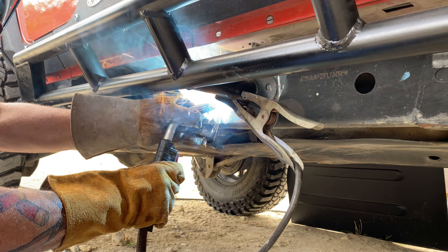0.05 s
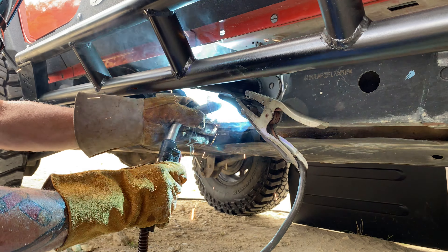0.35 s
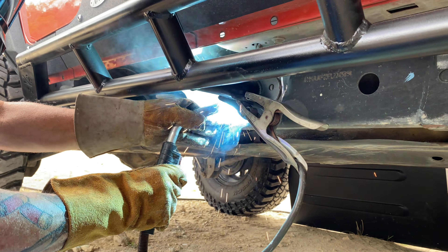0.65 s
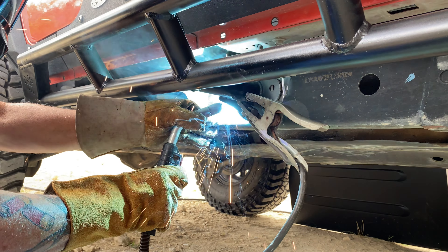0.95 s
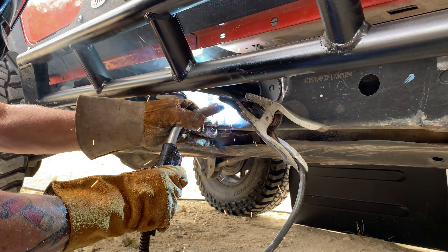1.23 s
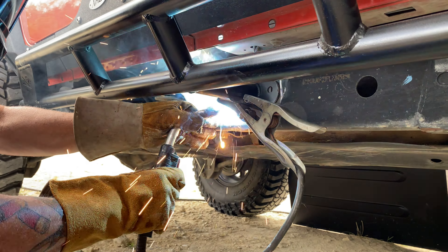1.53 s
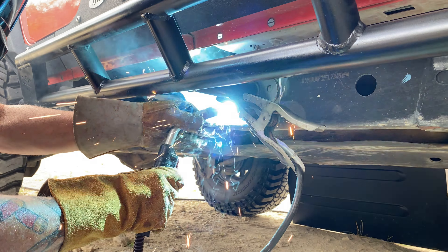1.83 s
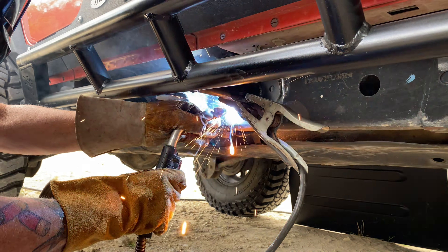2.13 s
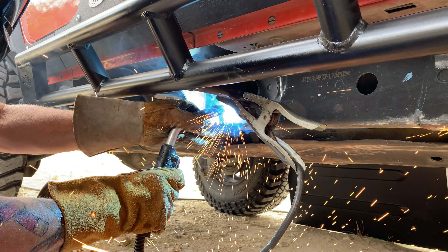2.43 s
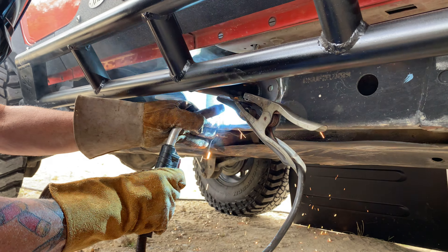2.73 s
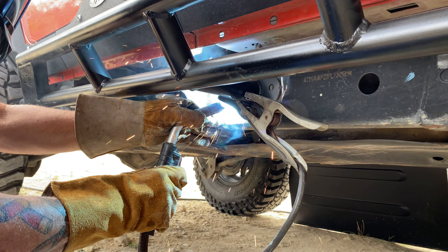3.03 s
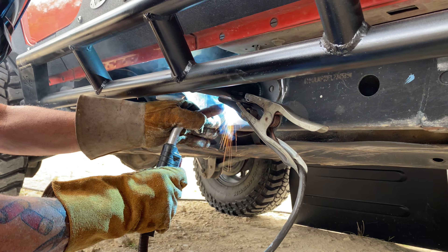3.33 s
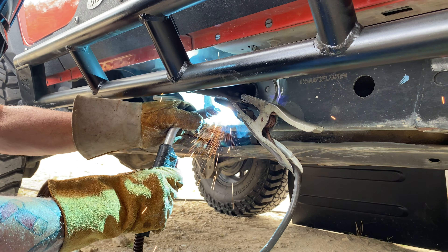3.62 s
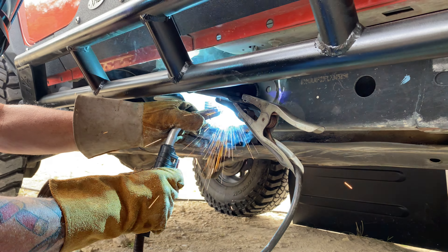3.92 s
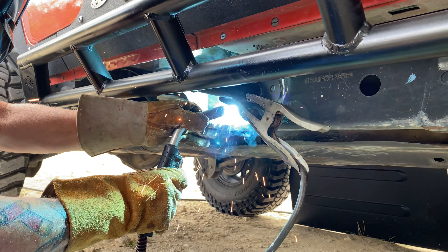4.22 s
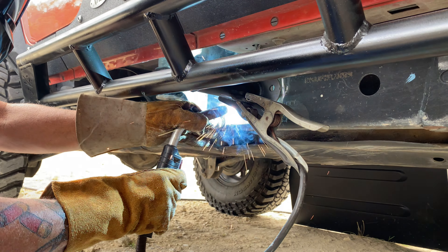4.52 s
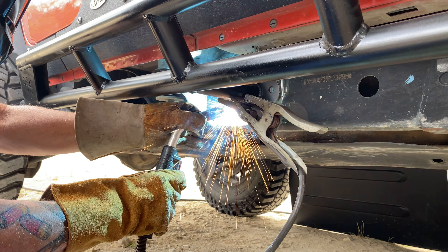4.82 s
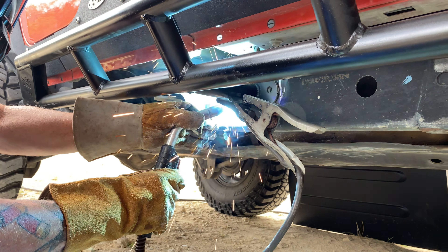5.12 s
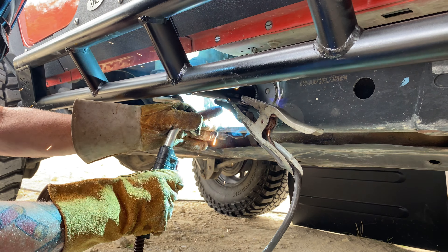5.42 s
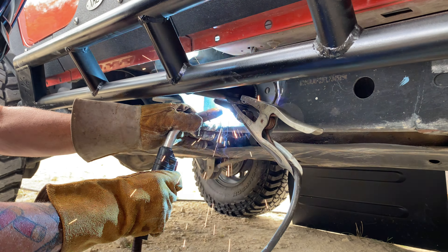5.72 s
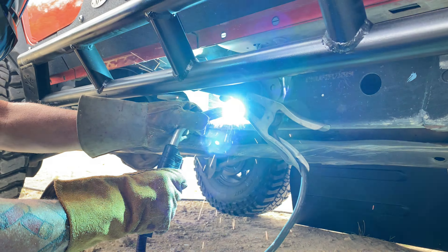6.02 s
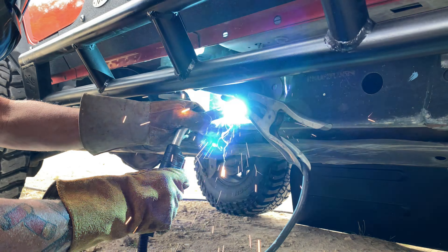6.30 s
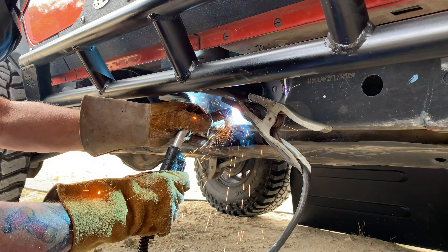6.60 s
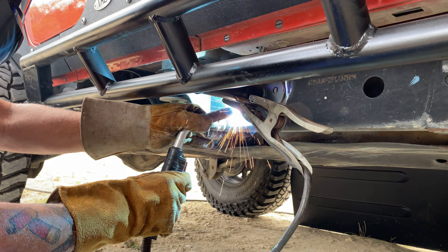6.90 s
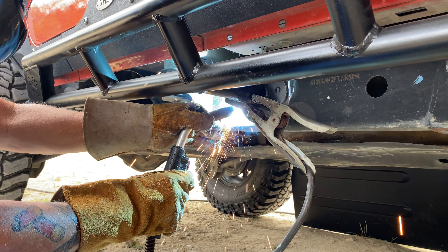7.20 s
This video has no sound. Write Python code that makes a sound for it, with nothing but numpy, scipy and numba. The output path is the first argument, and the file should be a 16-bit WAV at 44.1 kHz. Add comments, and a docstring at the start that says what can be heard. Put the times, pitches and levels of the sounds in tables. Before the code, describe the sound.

Close, sputtering wire-feed welding in a workshop: a thin, bright sizzle packed with irregular snaps and spits, faltering briefly.

```python
"""A hissing, sputtering arc, broken by sharp pops: a wire-feed welder runs a bead on a vehicle frame,
close by, in a workshop. The plasma hisses and spits droplets; each time the wire shorts into the pool
and burns free, it cracks and throws a puff of hot gas. When the wire stubs, the arc dies for a moment.
Resonances of the torch gap and the steel pocket colour the sound on its way to two microphones."""
import sys
import numpy as np
from scipy import signal
from scipy.fft import rfft, irfft, next_fast_len
from scipy.io import wavfile
from numba import njit

SR = 44100
rng = np.random.default_rng(int(sys.argv[2]) if len(sys.argv) > 2 else 0)


def output_pcm(signal):
    """Save a mono or channel-first signal as 16-bit PCM at the path in sys.argv[1].

    Samples are clipped to [-1, 1] before scaling.
    """
    pcm = np.clip(np.atleast_2d(signal).T, -1, 1) * 32767
    wavfile.write(sys.argv[1], SR, np.round(pcm).astype(np.int16))


N = 324135
TIME_S = np.arange(N) / SR
FFT_SIZE = next_fast_len(N + SR // 2)
FREQ_HZ = np.maximum(np.arange(FFT_SIZE // 2 + 1) * SR / FFT_SIZE, 1)
LEAD_IN = SR // 100  # samples ahead of each burst
BURST_TIME_S = np.arange(-LEAD_IN, SR // 30) / SR

# The wire burns free, at relative levels: start_s, crack_db, body_re_crack_db, thump_db, thump_hz
POPS = [(0.0741, -1, -15.5, -25.5, 192), (0.128, -10.5, -10.5, -28, 560), (0.2073, -10.5, -6, -14.5, 183),
        (0.2251, -11, -11, -24, 219), (0.2393, -9.5, -11.5, -29, 240), (0.2553, -11, -12.5, -20, 530),
        (0.314, -12.5, -8.5, -21, 530), (0.4038, -21.5, -3, -30, 560), (0.4497, -7, -12, -23.5, 200),
        (0.47, -7.5, -10.5, -22, 560), (0.5036, -10, -7.5, -14, 378), (0.5292, -10.5, -5.5, -19, 500),
        (0.564, -9.5, -5, -13, 563), (0.5862, -13, -10, -31, 560), (0.6034, -6, -15, -30, 560),
        (0.6358, -13.5, -8.5, -36, 530), (0.711, -7, -11, -15, 560), (0.738, -13.5, -11, -34, 560),
        (0.7542, -11.5, -9.5, -39, 500), (0.7947, -8, -17, -32, 445), (0.825, -8.5, -14, -39, 560),
        (0.8626, -4.5, -11, -22, 200), (0.8959, -8, -8.5, -24.5, 200), (0.9256, -7.5, -12, -28, 210),
        (0.9566, -4.5, -11.5, -21, 159), (0.9954, -7.5, -11.5, -19.5, 560), (1.0796, -18.5, -8, -34, 560),
        (1.0929, -12.5, -1.5, -19.5, 470), (1.161, -11.5, -10.5, -26, 530), (1.2048, -27, -6, -31, 530),
        (1.2382, -8, -15.5, -30, 190), (1.2711, -3, -13, -22.0, 270), (1.3863, -12.5, -11, -42, 560),
        (1.443, -19, -8.5, -50, 560), (1.479, -4.5, -12, -21.5, 105), (1.5116, -5.5, -12, -24, 180),
        (1.5376, -3, -15, -27.5, 100), (1.555, -10, -14.5, -32, 170), (1.5742, -15, -13, -38, 135),
        (1.6143, -11.0, -9, -23, 210), (1.6719, -11, -12.5, -29, 395), (1.687, -23.5, -2.5, -35, 355),
        (1.6964, -16.5, -7.5, -31, 300), (1.7286, -10, -10.5, -26, 240), (1.77, -12.5, -4, -20, 560),
        (1.7971, -12, -7.5, -26, 190), (1.8202, -10, -10, -23.5, 300), (1.8425, -10, -11.5, -34, 300),
        (1.8642, -18, -11, -37, 160), (1.8749, -5, -11.5, -29, 190), (1.9233, -12, -10.5, -31, 500),
        (1.9378, -19, -3.5, -29.5, 335), (1.9808, -9, -11, -26, 250), (2.1397, -6, -23, -41, 250),
        (2.1538, -5, -15, -29, 250), (2.23, -6.5, -19, -24, 560), (2.2757, -9.5, -16, -38, 560),
        (2.2887, -5, -20, -28.5, 265), (2.3038, -11, -16.5, -34.0, 560), (2.449, -8.5, -17.5, -36, 560),
        (2.454, -7, -20, -26, 556), (2.5872, -1, -20, -30, 210), (2.6039, -3.5, -15, -21.5, 229),
        (2.6148, -5.5, -17, -41, 200), (2.6243, -2.5, -16.5, -25.5, 230), (2.67, -1.5, -15.5, -26.5, 191),
        (2.8368, -11, -13.5, -28, 560), (2.9027, -12, -15, -28.5, 335), (3.0104, -4, -12, -24, 123),
        (3.0886, -25.5, -4, -34, 397), (3.213, -12, -17, -36, 560), (3.2404, -5, -17, -20.5, 560),
        (3.3001, -3.5, -23, -29.5, 100), (3.3622, -11.5, -18.5, -39, 500), (3.3841, -7.5, -21, -35, 335),
        (3.5294, -13, -17.5, -30, 560), (3.5573, -1, -18, -20, 172), (3.626, -6, -11.5, -27, 170),
        (3.649, -4, -15.5, -27, 170), (3.6782, -2.5, -19, -23.5, 135), (3.745, -8.5, -8, -23, 180),
        (3.775, -7.5, -11, -24, 225), (3.795, -3.5, -10.5, -22.5, 258), (3.8319, -10, -14, -28, 355),
        (3.8745, -5, -13.5, -26.5, 125), (3.9414, -9, -14.5, -32, 240), (3.982, -10, -14, -44, 560),
        (4.0015, -2, -16.5, -23.5, 150), (4.0437, -5, -12.5, -22.5, 134), (4.106, -15.5, -7.5, -31.0, 445),
        (4.1278, -14, -13, -23, 570), (4.138, -10.5, -16.5, -35, 280), (4.1609, -7.5, -17.5, -23, 560),
        (4.2127, -10, -7, -21, 156), (4.254, -14.5, -5.5, -20.5, 420), (4.3052, -10, -14.5, -24, 560),
        (4.387, -5, -12.5, -25, 200), (4.421, -4.5, -15.5, -22, 560), (4.4376, -13, -12, -27, 355),
        (4.4972, -15.5, -16, -44, 135), (4.57, -2.5, -18.5, -27, 445), (4.6083, -0.5, -19, -19, 355),
        (4.6434, -1.5, -19.5, -32, 210), (4.7544, -10, -24, -73, 265), (4.7682, -6.5, -24, -28.5, 583),
        (4.81, -4, -29, -28, 560), (4.8412, -8, -16, -32, 210), (4.847, 1, -23, -29.5, 210),
        (4.889, -1, -24, -26, 265), (4.9186, -9.5, -20, -32, 560), (4.9398, -10.5, -15, -32, 500),
        (4.9649, -6, -15, -19.0, 560), (5.003, -10, -15.5, -27, 560), (5.0461, -7.5, -16.5, -29, 250),
        (5.081, -16, -10.5, -32, 395), (5.0995, -3, -23.5, -32, 210), (5.1359, -8, -13, -27.5, 170),
        (5.163, -10.5, -19.5, -35, 280), (5.194, -15, -35, -37, 315), (5.226, -12.5, -19, -30, 560),
        (5.2683, -14, -20, -34, 470), (5.3503, -17.5, -15, -35, 530), (5.3678, -5, -19.5, -33.5, 191),
        (5.479, -19, -50, -65, 160), (5.4933, -6, -17, -33, 280), (5.524, -5.5, -22.5, -32.5, 190),
        (5.5472, -13, -18, -42, 420), (5.5617, -12, -18, -30, 560), (5.6197, -7, -15, -26.5, 250),
        (5.666, -9.5, -13.5, -31, 265), (5.6953, -3.5, -21, -34, 180), (5.737, -6.5, -12.5, -30, 250),
        (5.7696, -5.5, -11, -21, 150), (5.7987, -11, -6, -20, 560), (5.829, -6.5, -11.5, -22.5, 190),
        (5.8478, -4.5, -19, -42, 210), (5.881, -8.5, -7.5, -23, 180), (5.899, -13, -8, -28, 170),
        (5.9397, -7, -15, -34, 190), (5.956, -19.5, -6, -32, 190), (5.986, -9.5, -10, -27, 210),
        (6.0192, -7.5, -11.5, -31, 560), (6.0504, -9, -9, -29, 250), (6.0695, -7.5, -16.0, -31, 395),
        (6.0765, -18, -7, -35, 420), (6.085, -15.5, -9.5, -31, 335), (6.108, -6, -14.5, -24, 315),
        (6.1328, -4.5, -12.5, -23, 190), (6.1586, -8, -7.5, -18, 190), (6.1853, -8, -8.5, -24.5, 173),
        (6.2258, -9.5, -9, -27, 170), (6.248, -10.5, -11.5, -30, 210), (6.286, -10.5, -8.5, -25.5, 160),
        (6.314, -5.5, -13.5, -21, 211), (6.57, -6.5, -15, -26, 315), (6.598, -6, -18.5, -34, 200),
        (6.6081, -9.5, -15, -46.5, 200), (6.6184, -6, -19, -41, 200), (6.6312, -10, -18, -46, 560),
        (6.703, -2.5, -20, -29, 225), (6.739, -12, -40, -67, 240), (6.7742, -7, -21.5, -48, 240),
        (6.7927, -4, -13.5, -21, 240), (6.864, 3, -20.5, -18.5, 563), (6.932, -6.5, -18.5, -26.5, 560),
        (6.9704, -9, -13, -28, 355), (7.0009, -13, -14, -31, 335), (7.0188, -8.5, -17, -30, 315),
        (7.0361, -6, -11, -21.5, 393), (7.1427, -6, -12.5, -38, 225), (7.1952, -10.5, -10.5, -36, 375),
        (7.2145, -6, -13.5, -37, 335), (7.3014, -29, -16, -46, 265), (7.3166, -9.5, -13, -39, 194)]
# Relative strength of the rasp under the arc's hiss: time_s, level_db
RASP = [(0, -4.5), (1.2, -5), (1.9, -2), (2.4, -11.5), (2.53, -12), (2.61, -2), (2.68, -8), (2.8, -0.5),
        (3.2, -9), (3.5, -6), (4.3, -6), (4.8, -9.5), (5.15, -4.5), (5.35, -8.5), (5.46, -24), (5.6, -10),
        (5.85, -2.5), (6.3, -6.5), (6.45, -9.5), (6.6, -9), (6.74, -10.5), (7.35, -5)]


def from_db(db):
    """Amplitude grows tenfold every 20 dB."""
    return 10 ** (np.asarray(db) / 20)


def unit_rms(x):
    """Normalisation to unit mean power."""
    return x / np.sqrt(np.mean(x ** 2) + 1e-20)


def over_time(points, t=TIME_S):
    """Linear interpolation of (time_s, value) points."""
    return np.interp(t, *np.transpose(points))


def over_frequency(points):
    """Interpolation of (frequency_hz, value) points on a logarithmic frequency axis."""
    hz, value = np.transpose(points)
    return np.interp(np.log(FREQ_HZ), np.log(np.sort(hz)), value)


def filtered(x, response):
    """Convolution in time is multiplication in frequency."""
    return irfft(rfft(x, FFT_SIZE) * response, FFT_SIZE)[..., :N]


def coloured(x, spectrum):
    """Spectral shaping that conserves the power of a white signal."""
    return filtered(x, unit_rms(from_db(over_frequency(spectrum))))


def delay(seconds):
    """A pure delay shifts phase in proportion to frequency."""
    return np.exp(-2j * np.pi * FREQ_HZ * seconds)


def dispersion(lag_s):
    """An all-pass response: phase lag is the integral of group delay over frequency."""
    return np.exp(-2j * np.pi * np.cumsum(lag_s) * SR / FFT_SIZE)


def drift(bandwidth_hz):
    """Random modulation of unit rms, mostly below the given frequency."""
    knots = rng.standard_normal(FFT_SIZE // 16)
    return unit_rms(np.interp(TIME_S * 2 * bandwidth_hz, np.arange(len(knots)), knots))


def arc_level_db(t):
    """The arc's envelope follows the welder's hand and collapses wherever the wire stubs."""
    # Relative level of the burning arc: time_s, level_db
    burn = [(0, -34), (.18, -38), (.39, -32), (.45, -36.5), (.93, -35.5), (1.3, -33), (1.68, -34),
            (1.9, -34.5), (2.1, -40), (2.23, -22), (2.35, -43.5), (2.44, -36), (2.54, -40), (2.6, -33),
            (2.8, -35), (2.95, -32.5), (3.2, -32.5), (3.3, -35.5), (3.47, -36), (3.6, -36), (4.1, -37),
            (4.55, -36), (4.7, -33), (4.76, -37.5), (4.92, -32), (5.02, -41.5), (5.2, -30), (5.43, -34),
            (5.55, -34.5), (5.9, -35.5), (6.3, -34.5), (6.44, -30.5), (6.56, -28.5), (6.66, -36.5),
            (6.76, -23.5), (6.9, -36.5), (7.35, -33)]
    # The wire stubs and the arc dies: start_s, end_s, depth_db
    stubs = [(0.32, 0.354, -6.5), (0.41, 0.43, -14), (1.455, 1.466, -11.5), (1.588, 1.602, -10),
             (1.997, 2.077, -19), (2.176, 2.243, -24.5), (2.485, 2.497, -5), (2.846, 2.881, -10),
             (3.249, 3.286, -12), (3.4, 3.412, -12), (3.574, 3.612, -7.5), (3.703, 3.76, -6),
             (4.183, 4.191, -14), (4.466, 4.482, -10), (4.659, 4.725, -12.5), (5.581, 5.587, -21),
             (6.34, 6.419, -10), (6.464, 6.541, -22.5), (6.81, 6.839, -11)]
    die_s, relight_s = 0.0017, 0.019
    coarse_s = np.arange(0, N / SR, .001)
    stub_db = np.zeros(len(coarse_s))
    for start_s, end_s, depth_db in stubs:
        dying = (coarse_s - start_s) / die_s
        relighting = (end_s - coarse_s) / relight_s + 1
        stub_db += depth_db * np.clip(np.minimum(dying, relighting), 0, 1)
    return over_time(burn, t) + np.interp(t, coarse_s, stub_db)


def arc():
    """Amplitude-modulated noise: the plasma hisses and tiny droplets tick; loud pops blow it down."""
    # Spectral density of the thin hiss: frequency_hz, level_db
    hiss_spectrum = [(600, -17), (1300, -20), (2600, -32), (4200, -10.5), (6000, -1), (8000, 2.5),
                     (10000, 2), (12500, 3.5), (14500, 7)]
    # Spectral density of the rasping spatter: frequency_hz, level_db
    rasp_spectrum = [(100, -25), (300, 9.5), (600, -5.5), (1300, 4), (2800, 12), (6000, 4.5), (10000, -38),
                     (15000, -44)]
    loud_pop_db, lull_db, recovery_s = -16, -5.5, 0.11
    flutter_db, fizz_db, ragged_db = 2.2, 2.0, 2.9
    ticks_per_s, tick_spread_db = 1600, 3.0

    pop_s = np.sort([start_s for start_s, crack_db, *_ in POPS if crack_db > loud_pop_db])
    since_pop_s = abs(TIME_S - pop_s[np.searchsorted(pop_s, TIME_S) - 1])
    dips_db = lull_db * np.exp(-since_pop_s / recovery_s)
    strength = from_db(arc_level_db(TIME_S) + dips_db + flutter_db * drift(70))
    hiss = from_db(5.5) * unit_rms(rng.standard_normal(N) * from_db(fizz_db * drift(730)))

    tick_sizes = from_db(tick_spread_db * np.minimum(rng.exponential(1, N), 3))
    polarity = rng.choice([-1, 1], N)
    ticks = from_db(1) * unit_rms(tick_sizes * polarity * (rng.random(N) < ticks_per_s / SR))
    rasp = rng.standard_normal(N) + ticks
    rasp *= from_db(over_time(RASP) - 6 + ragged_db * drift(130))
    return coloured(strength * hiss, hiss_spectrum) + coloured(strength * rasp, rasp_spectrum)


def shop_air():
    """Background noise: a faint, low murmur, largely coherent between the two microphones."""
    # Spectral density of the quiet shop: frequency_hz, level_db
    spectrum = [(25, -12), (90, 16), (250, 12), (600, 8), (1500, -25), (15000, -32)]
    noise = rng.standard_normal(N) + 0.25 * rng.standard_normal((2, N))
    return from_db(-69) * coloured(noise, spectrum)


def faint_spits():
    """A random point process: drops leave the wire at log-normal intervals, as strong as the arc."""
    median_interval_s, spread_db = 1 / 55, 2.5
    chance = rng.standard_normal((400, 3))
    start_s = median_interval_s * np.cumsum(np.exp(chance[:, 0] / 2))
    crack_db = arc_level_db(start_s) + 1 + spread_db * chance[:, 1]
    body_re_crack_db = over_time(RASP, start_s) - 1 + spread_db * chance[:, 2]
    return np.column_stack([start_s, crack_db, body_re_crack_db])[start_s < N / SR]


def bursts(lead_db, spray_db, tail_db, tail_s, lead_s=.003, spray_s=.0014, count=660):
    """Impulses of equal energy: a neck of molten wire sizzles, bursts in one shock and sprays."""
    t = BURST_TIME_S
    sizzle = from_db(lead_db) * np.exp(-abs(t) / lead_s)
    spray = from_db(spray_db) * np.exp(-abs(t) / spray_s)
    tail = from_db(tail_db) * np.exp(-abs(t) / tail_s)
    grit = rng.standard_normal((count, len(t))) * from_db(0.44 * rng.standard_normal((count, 1)))
    shapes = (t == 0) + np.where(t < 0, sizzle, spray + tail) * grit
    energy = np.sum(shapes ** 2, axis=1, keepdims=True)
    return shapes * np.sqrt(.004 * SR / energy)  # the energy of 4 ms at unit rms


def superpose(times_s, shapes, levels_db):
    """Linear superposition of bursts, each at its own time and level."""
    track = np.zeros(FFT_SIZE)
    for start_s, shape, gain in zip(times_s, shapes, from_db(levels_db)):
        start = max(round(start_s * SR), 0)
        track[start:start + len(shape)] += gain * shape
    return track[LEAD_IN:LEAD_IN + N]


def steel_bounces(mean_lag_s, spacing_hz):
    """Multiple reflection between close steel faces delays some frequencies more than others."""
    knots_hz = np.arange(0, SR, spacing_hz)
    lag_s = mean_lag_s * rng.exponential(1, 1000)[:len(knots_hz)]
    return dispersion(np.interp(FREQ_HZ, knots_hz, lag_s))


def wire_snaps():
    """Short shocks have broad spectra: every spit and pop has a bright crack and a hollow body."""
    # Droplets spit off the wire with no puff of gas, at relative levels: start_s, crack_db
    droplets = [(.0144, -16), (0.1575, -16.5), (0.1816, -19), (.6763, -18), (.6883, -23), (.7716, -18),
                (0.7913, -16), (1.0405, -17.5), (1.2155, -23), (1.258, -35), (1.3255, -29), (1.496, -17),
                (1.9553, -19), (2.143, -17), (2.3212, -20.5), (2.358, -30), (2.4292, -25), (2.516, -26),
                (2.5912, -18), (2.5948, -10), (2.7736, -20), (2.782, -21), (2.9434, -16), (2.9884, -22),
                (3.1033, -24), (3.1412, -23), (3.2007, -34), (3.4415, -25), (3.5099, -19), (3.9159, -16.5),
                (4.0865, -20), (4.2729, -19), (4.2869, -17), (4.51, -23), (4.5303, -19), (4.7967, -30),
                (5.0357, -20), (5.254, -29), (5.3045, -43), (5.323, -36), (5.338, -24), (5.406, -27),
                (5.5364, -23), (5.686, -34), (5.9259, -21), (6.2089, -31), (6.3577, -32), (6.3796, -47),
                (6.4549, -21.5), (6.546, -21.5), (6.727, -35), (6.7554, -34), (6.8959, -19), (6.9102, -16),
                (7.0515, -18), (7.0692, -19), (7.0874, -17), (7.108, -18), (7.178, -17)]
    # Spectral density of the crack: frequency_hz, level_db
    crack_spectrum = [(1300, -31), (1800, -19.5), (2600, 3), (3400, -2), (4200, -4.5), (6500, 1.5),
                      (9000, 2.5), (12500, 0.5), (15000, 14)]
    # Spectral density of the body: frequency_hz, level_db
    body_spectrum = [(150, 14), (330, -2), (550, -12.5), (720, -0.5), (1500, 2), (2800, 0), (3500, -6.5),
                     (5000, -10.5)]
    spits = [(start_s, crack_db, -13) for start_s, crack_db in droplets]
    events = np.vstack([np.array(POPS)[:, :3], spits, faint_spits()])
    start_s, crack_db, body_re_crack_db = events.T
    sharp = bursts(lead_db=-29, spray_db=-10.5, tail_db=-28, tail_s=.0045)
    hollow = bursts(lead_db=-36, spray_db=-25, tail_db=-36, tail_s=.007)
    crack = coloured(superpose(start_s, sharp, crack_db - 4.5), crack_spectrum)
    body = coloured(superpose(start_s, hollow, crack_db + body_re_crack_db + 0.5), body_spectrum)
    return filtered(crack + body, steel_bounces(mean_lag_s=.00042, spacing_hz=170))


def gas_puffs(q):
    """Damped oscillation: expanding gas rings about one cycle; large bubbles plop, small ones tock."""
    # Frequency weighting of the thump: frequency_hz, gain_db
    weighting = [(20, -32), (50, -11.5), (95, 1.5), (220, 0), (400, 0.5), (600, -2), (1200, -55)]
    start_s, _, _, thump_db, thump_hz = np.transpose(POPS)
    cycles = thump_hz[:, None] * abs(BURST_TIME_S)
    puffs = (BURST_TIME_S >= 0) * np.exp(-np.pi * cycles / q) * np.cos(2 * np.pi * cycles)
    return filtered(superpose(start_s, puffs, thump_db), from_db(over_frequency(weighting)))


@njit
def high_pass(x, tuning, damping):
    """A two-pole resonator with a moving corner passes what lies above its resonance."""
    high, low, band = np.zeros(len(x)), 0., 0.
    for i in range(len(x)):
        low += tuning[i] * band
        high[i] = x[i] - low - damping[i] * band
        band += tuning[i] * high[i]
    return high


def torch_gap(snaps, sizzle):
    """Cavity resonance: the gap around the torch rings at its lowest mode and emits little below it."""
    # The lowest mode moves with the hands: time_s, pitch_hz
    mode = [(0, 780), (.42, 610), (.56, 546), (1.0, 700), (1.27, 680), (1.33, 920), (1.44, 870), (1.5, 700),
            (1.8, 696), (2.3, 795), (2.7, 730), (3.6, 600), (4.55, 745), (4.9, 845), (5.17, 1360),
            (5.5, 1450), (5.78, 700), (6.3, 694), (6.8, 930), (7.1, 1440), (7.35, 1210)]
    # Snaps ring longer while the torch nearly closes the gap: time_s, inverse_q
    snap_damping = [(5.05, .97), (5.2, .3), (5.45, .3), (5.62, .97)]
    tuning = 2 * np.sin(np.pi * over_time(mode) / SR)
    ringing = high_pass(snaps, tuning, over_time(snap_damping))
    return ringing + high_pass(sizzle, tuning, np.full(N, 0.94))


def steel_pocket(x):
    """Interference in the pocket between frame and sill lifts some frequencies and cancels others."""
    # Resonances and cancellations: centre_hz, width_hz, gain_db
    peaks_and_dips = [(520, 50, 6.5), (225, 50, 3.5), (875, 200, 3), (1040, 110, -7), (1335, 226, 8),
                      (1550, 440, -11), (1905, 110, 2), (2230, 100, -4.5), (2380, 80, 3), (2655, 80, 2),
                      (4200, 500, -3), (4510, 350, 7), (5435, 90, 4.5), (5870, 140, 6), (7025, 110, 4),
                      (8500, 500, -5), (9690, 730, 5), (14100, 340, 2)]
    for centre_hz, width_hz, gain_db in peaks_and_dips:
        tuning = -2 * np.cos(2 * np.pi * centre_hz / SR)
        half_width, lift = np.pi * width_hz / SR, from_db(gain_db / 2)
        numerator = [1 + half_width * lift, tuning, 1 - half_width * lift]
        denominator = [1 + half_width / lift, tuning, 1 - half_width / lift]
        x = signal.lfilter(numerator, denominator, x)
    return x


def reverberation(t60_s, onset_s):
    """A diffuse field: the response of countless reflections, decaying exponentially."""
    t = np.arange(SR // 2) / SR
    tail = rng.standard_normal(len(t)) * from_db(-60 * t / t60_s) * (1 - np.exp(-t / onset_s))
    return rfft(tail / np.sqrt(np.sum(tail ** 2)), FFT_SIZE)


def workshop(x, echo_cut_hz, room_db, room_cut_hz):
    """Multipath propagation: direct sound, glances, dull echoes and a faint room reach two microphones."""
    # Reflections from nearby surfaces: delay_s, gain_db
    surfaces = [(.0075, -23), (.0105, -22), (.0123, -20), (.0138, -21), (.0186, -24)]
    # Glancing paths off glove and frame: delay_s
    glances = [0.0002286, 0.0005635, 0.001165]
    # Weight of those paths, which differ at the two microphones: frequency_hz, gain_db
    scatter = [(100, -19), (700, -15), (2000, -10.5), (5000, -9.5), (9000, -6.5), (15000, -28)]
    # Level difference between the microphones: frequency_hz, left_minus_right_db
    balance = [(100, 0.5), (380, 0.5), (700, 5), (1700, 1.5), (2500, 3), (5000, 6), (7500, 0.5), (8600, 0)]
    treble_lag_s, treble_split_hz = .00029, 6020

    echoes = sum(from_db(db) * delay(s) for s, db in surfaces) / (1 + 1j * FREQ_HZ / echo_cut_hz)
    room = np.array([reverberation(t60_s=.14, onset_s=.00084) for _ in range(2)])
    room /= 1 + 1j * FREQ_HZ / room_cut_hz
    room[1] += (room[0] - room[1]) / (1 + (FREQ_HZ / 700) ** 2)  # both sides share the bass
    # The arc dances on the pool, so each glancing path swells and fades.
    glancing = sum(rfft(x * [drift(25), drift(25)], FFT_SIZE) * delay(s) for s in glances)
    heard = rfft(x, FFT_SIZE) * (1 + echoes + from_db(room_db) * room)
    heard += from_db(over_frequency(scatter)) * glancing
    # The highest treble reaches the right microphone first, the rest the left.
    heard[0] *= dispersion(treble_lag_s * (FREQ_HZ > treble_split_hz)) * delay(-1 / SR)
    heard *= from_db(np.array([[.5], [-.5]]) * over_frequency(balance))
    return irfft(heard, FFT_SIZE)[:, :N]


def scene():
    """Source and filter: the weld sounds through gap, pocket and room, over the quiet shop air."""
    snaps = wire_snaps()
    weld = steel_pocket(torch_gap(snaps, arc()) + gas_puffs(q=0.71))
    air = shop_air()
    return workshop(weld, echo_cut_hz=3500, room_db=-16, room_cut_hz=6000) + air


def record(dry):
    """Dispersion trails each pop with a falling chirp; saturation rounds peaks; the top is cut."""
    # Group delay of the microphone, which passes the bass late: frequency_hz, delay_s
    bass_lag = [(50, .022), (90, .016), (130, .0105), (250, .0055), (500, .002), (900, .0005), (2000, 0)]
    cutoff_hz = 15800
    rounded = np.tanh(filtered(dry, dispersion(over_frequency(bass_lag))))
    return filtered(rounded, 1 / np.sqrt(1 + (FREQ_HZ / cutoff_hz) ** 240))


dry = scene()
out = record(dry)
output_pcm(out)
```